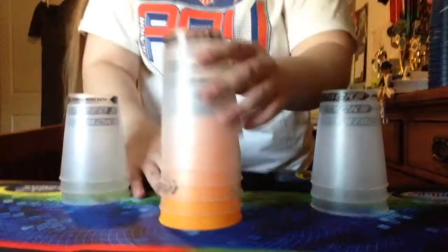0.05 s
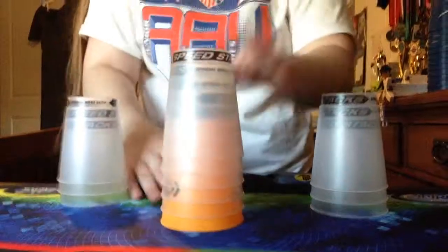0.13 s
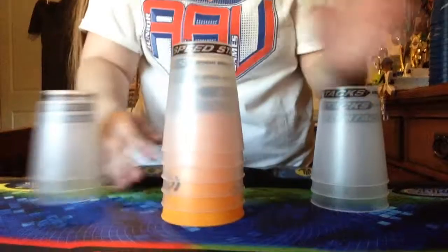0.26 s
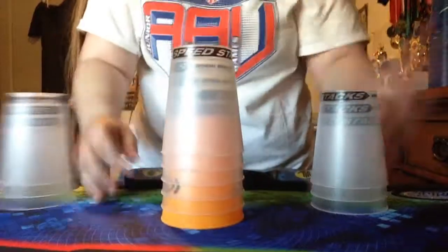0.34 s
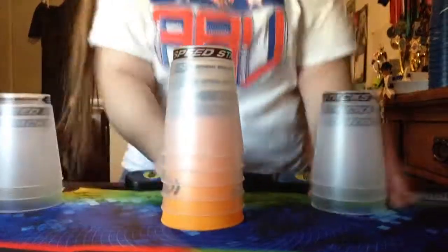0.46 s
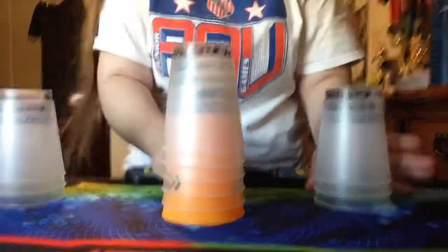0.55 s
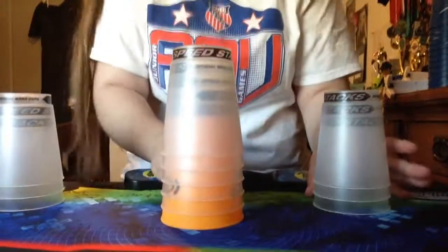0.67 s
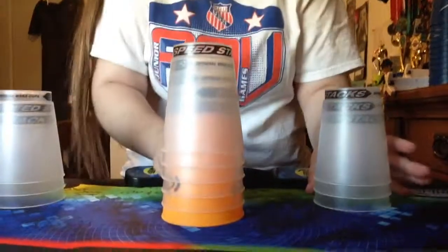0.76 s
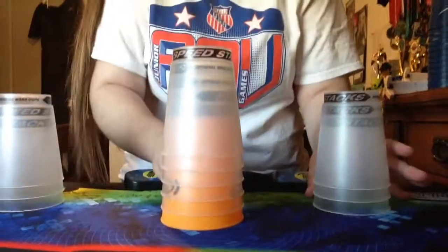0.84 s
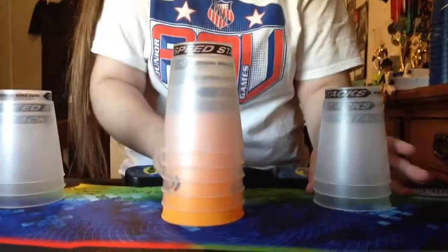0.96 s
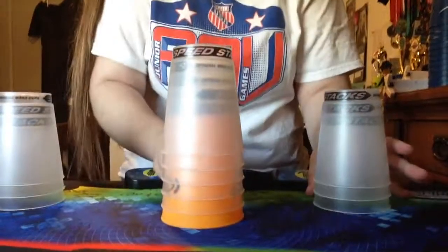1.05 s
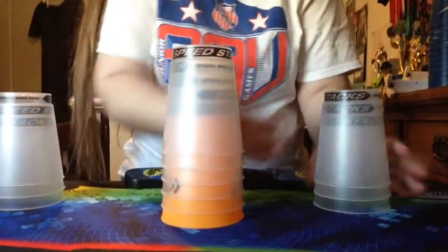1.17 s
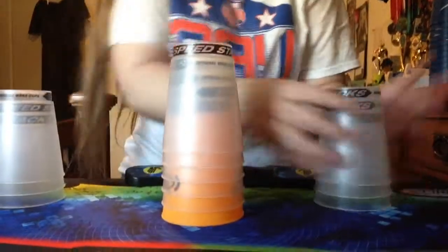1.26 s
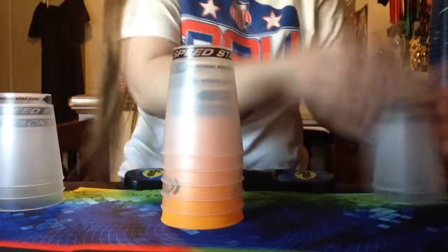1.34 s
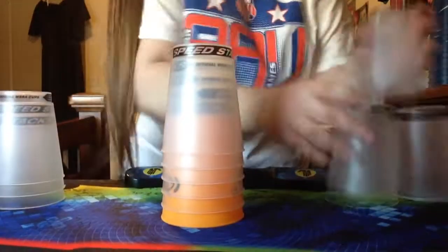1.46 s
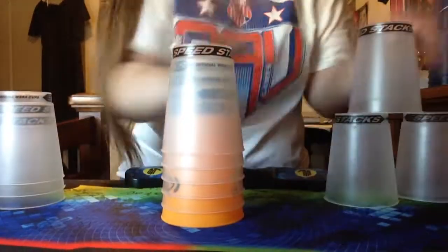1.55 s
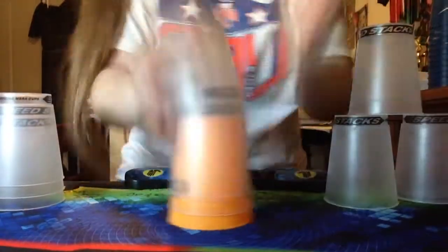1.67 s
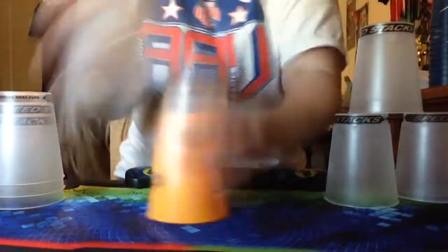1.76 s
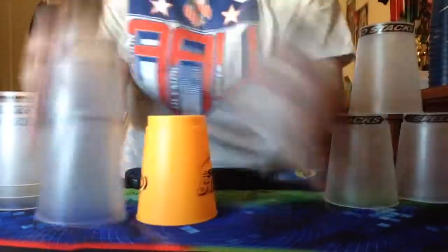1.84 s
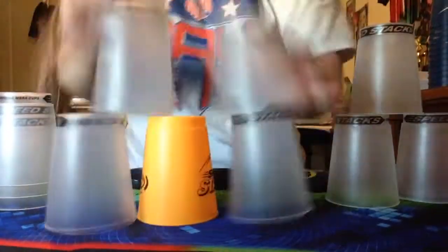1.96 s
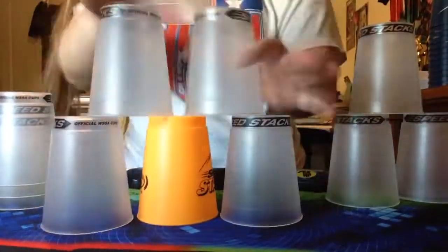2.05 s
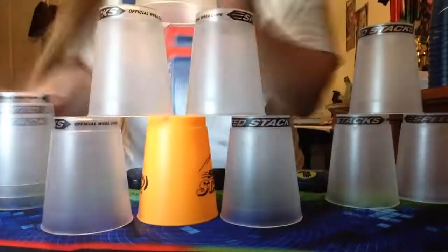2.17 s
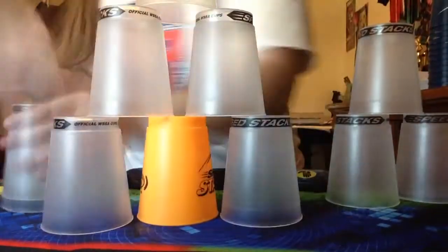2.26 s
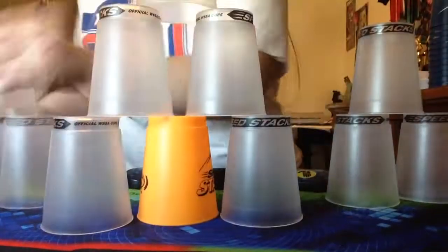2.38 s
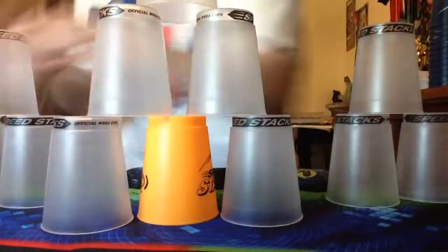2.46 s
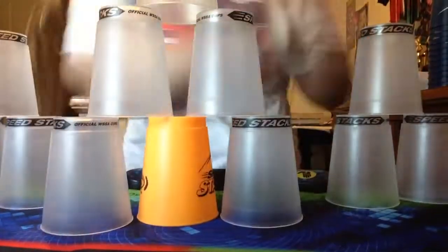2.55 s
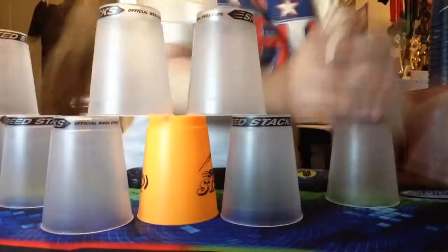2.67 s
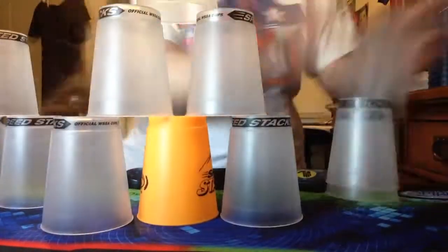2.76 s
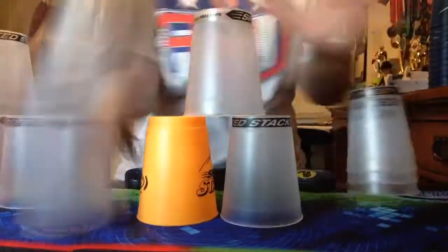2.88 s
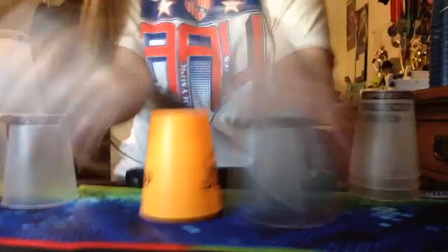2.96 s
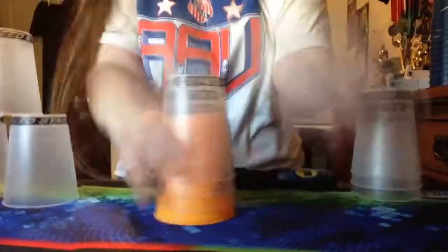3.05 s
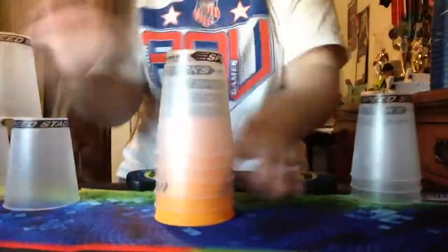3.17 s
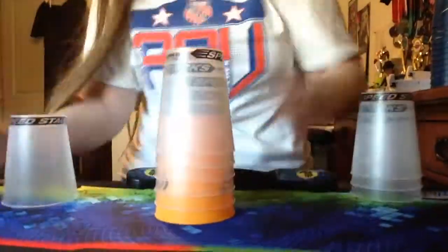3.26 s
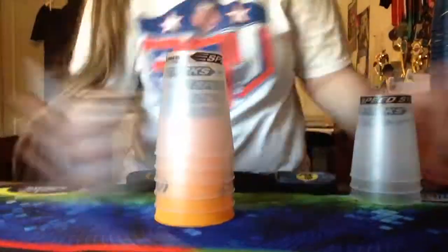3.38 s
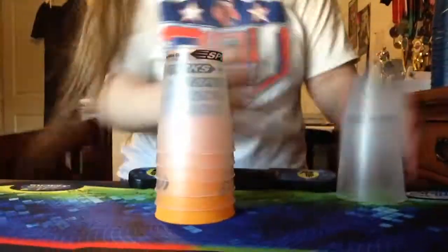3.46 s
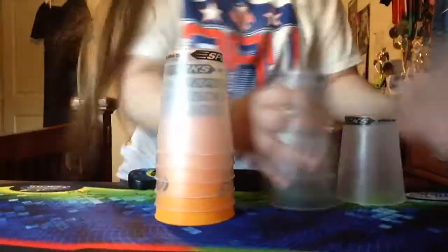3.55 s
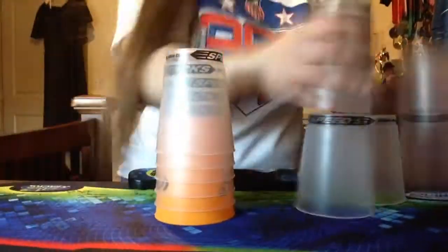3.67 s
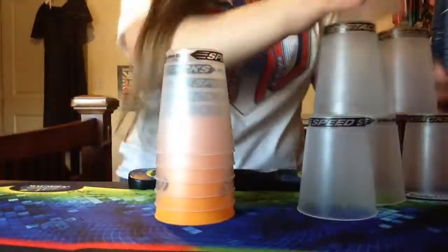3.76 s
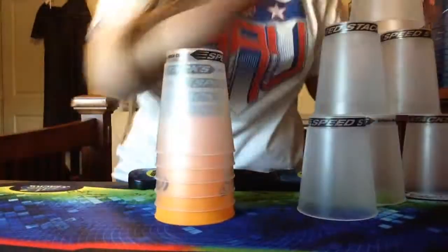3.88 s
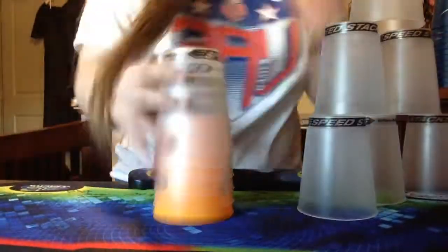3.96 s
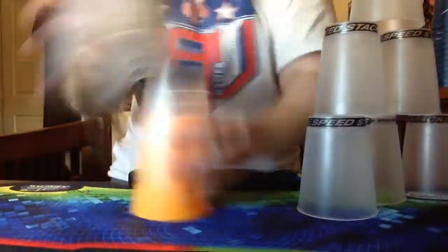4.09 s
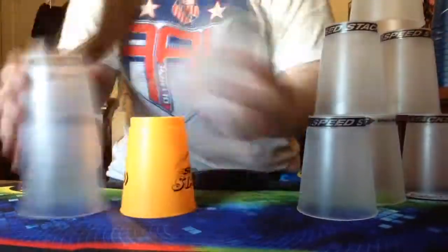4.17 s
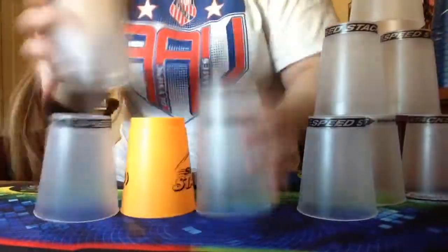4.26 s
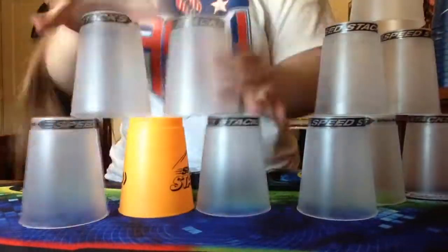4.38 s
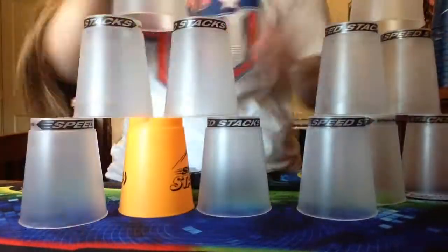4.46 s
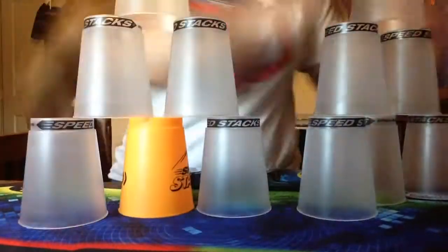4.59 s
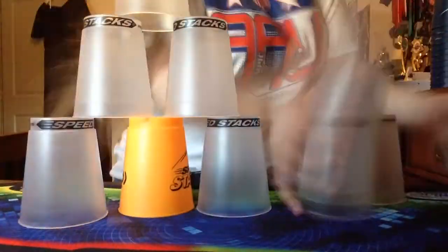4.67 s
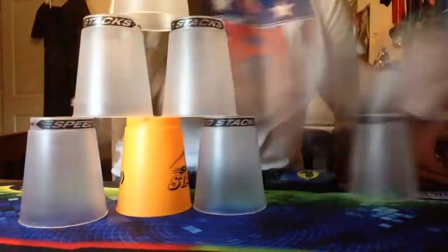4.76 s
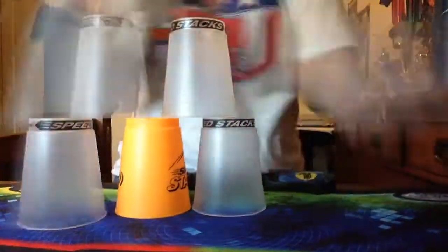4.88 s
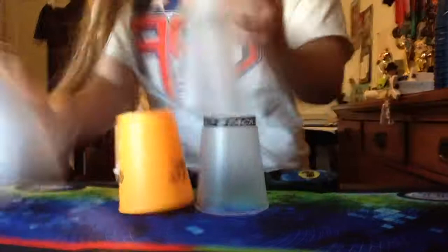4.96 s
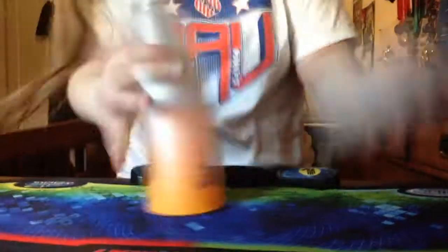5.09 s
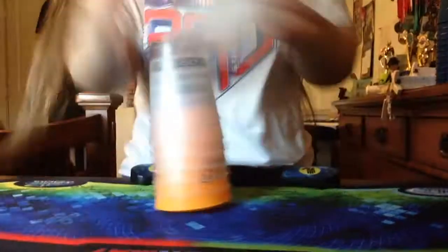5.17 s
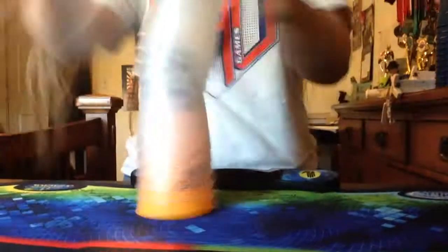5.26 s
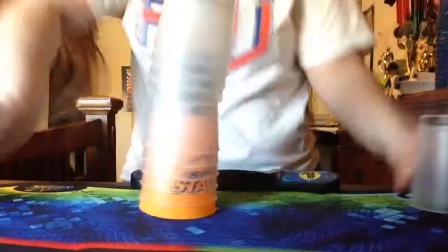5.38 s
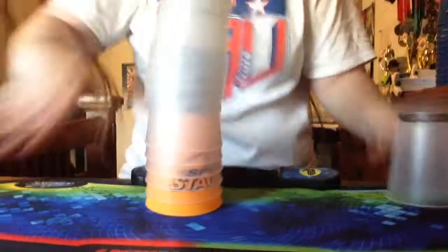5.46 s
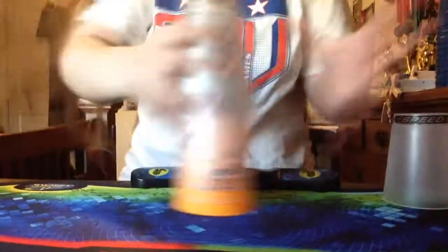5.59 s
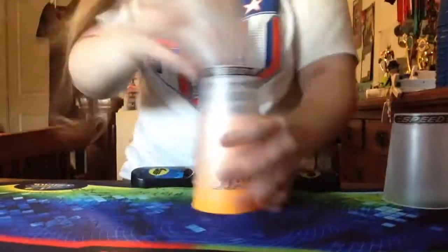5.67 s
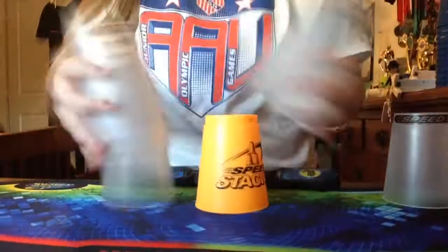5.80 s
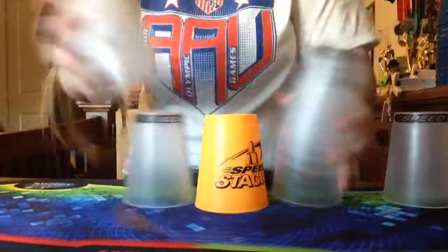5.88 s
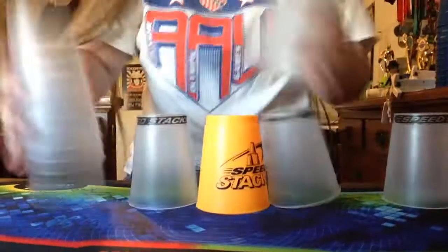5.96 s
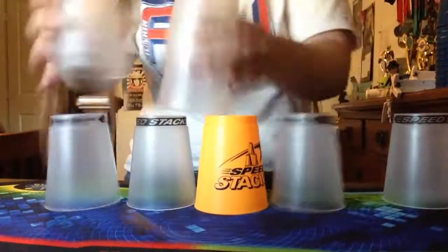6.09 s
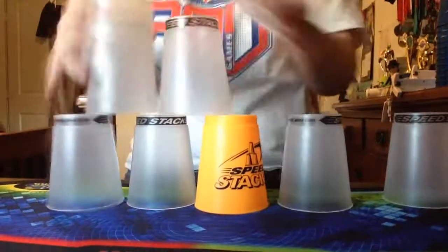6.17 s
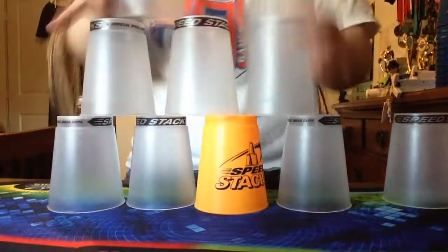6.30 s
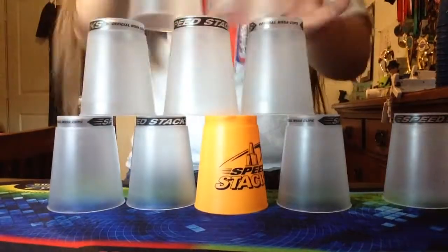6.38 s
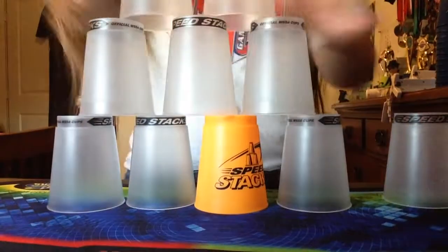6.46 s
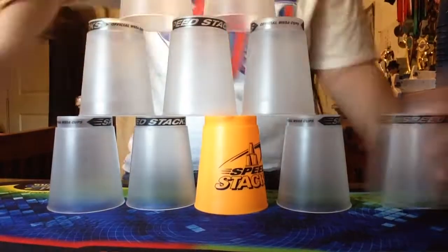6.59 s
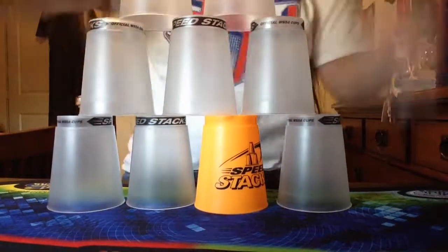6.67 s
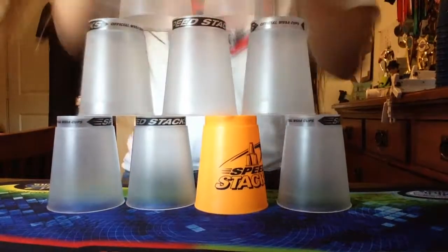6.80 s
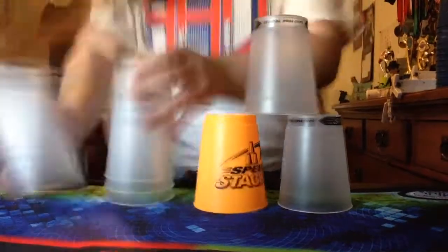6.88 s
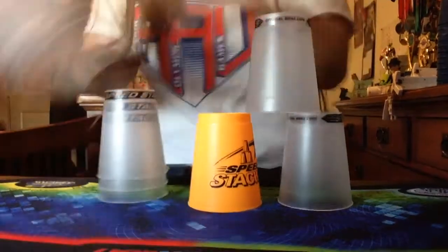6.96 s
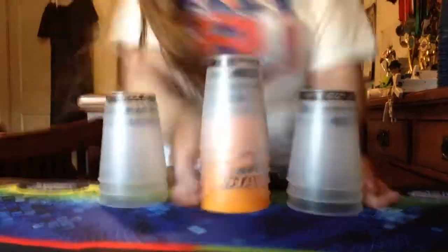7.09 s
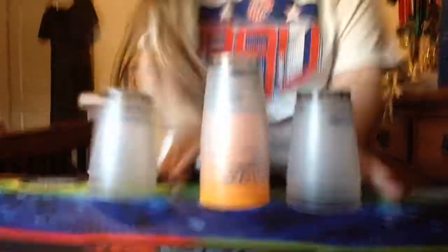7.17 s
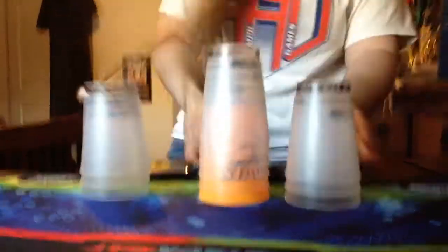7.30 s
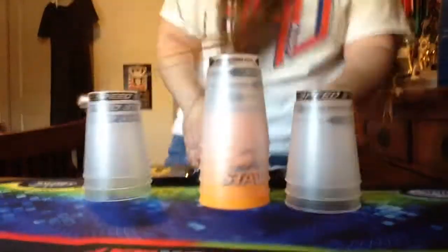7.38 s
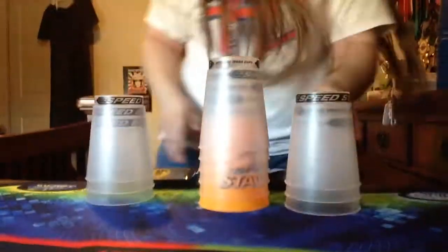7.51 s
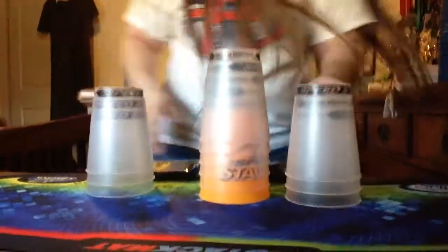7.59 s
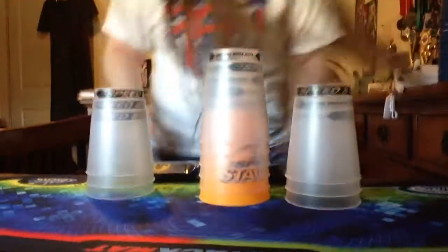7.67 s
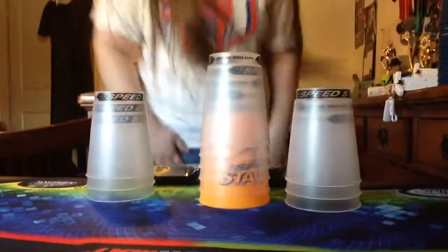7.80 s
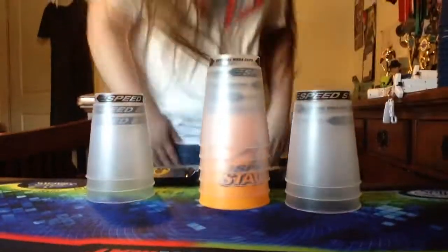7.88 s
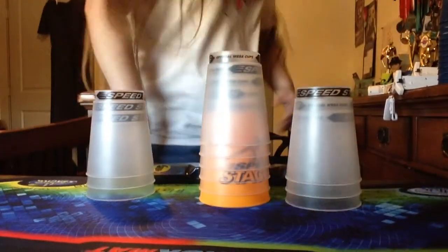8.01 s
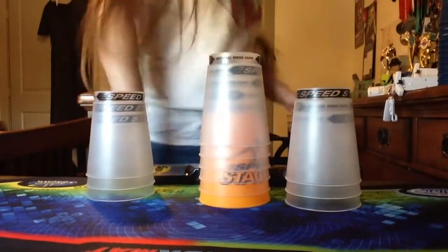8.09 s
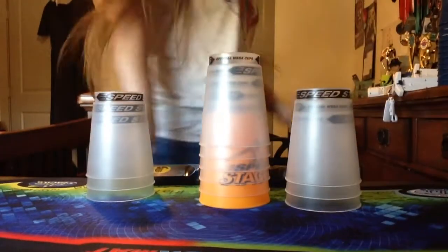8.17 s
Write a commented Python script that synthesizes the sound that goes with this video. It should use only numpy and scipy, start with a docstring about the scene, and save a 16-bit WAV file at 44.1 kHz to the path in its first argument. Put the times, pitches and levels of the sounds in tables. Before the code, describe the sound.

Close up in a small room, light plastic cups are stacked and unstacked very fast on a soft mat over a wooden table. After a few quiet taps come bursts of hollow clacks and dry rim clicks, then loud rattling collapses as cups nest, with falling pitch. It ends with two big rattles, near silence and one hand clap.

```python
"""A small room with a mat on a wooden table: plastic cups are stacked into pyramids and swept down at speed.
Rims click as short noise cracks with a ping; cups knock and the table thumps as damped modes.
Nesting cups rattle with a hollow note falling in pitch, sliding walls hiss in grains, one hand clap ends the run.
Decaying noise echoes form the room; a close mono microphone with a fast limiter picks it up."""
import sys
import numpy as np
from scipy import signal
from scipy.fft import rfft, irfft, next_fast_len
from scipy.io import wavfile
from scipy.ndimage import uniform_filter1d, minimum_filter1d

SR = 44100
rng = np.random.default_rng(int(sys.argv[2]) if len(sys.argv) > 2 else 0)


def digitize_waveform(pressure):
    """Quantize a signal to 16-bit integers and store it at the path in sys.argv[1].

    Rows of a 2-D input are taken as channels; values are limited to [-1, 1].
    """
    field = np.atleast_2d(pressure).T
    bounded = np.clip(field, -1, 1)
    quanta = np.round(bounded * 32767).astype(np.int16)
    wavfile.write(sys.argv[1], SR, quanta)


N = 363384
TOP_HZ = 15600  # band limit
TIME_S = np.arange(N) / SR
HIT_S = np.arange(SR // 5) / SR  # time since a blow
TICK_S = HIT_S[:SR // 25]


def amp(db):
    """Decibels to linear amplitude."""
    return 10 ** (np.asarray(db) / 20)


def unit(x, size=None):
    """Scale to rms 1 over the first size samples."""
    return x / np.sqrt(np.mean(x[:size] ** 2) + 1e-20)


def along(points, hz):
    """Interpolate (Hz, value) points on a log frequency axis."""
    point_hz, value = np.transpose(points)
    return np.interp(np.log(hz + 1), np.log(point_hz), value)


def add(track, start_s, sound):
    """Mix a sound into a track."""
    start = max(round(start_s * SR), 0)
    part = track[start:start + len(sound)]
    part += sound[:len(part)]


def colour(x, spectrum, size=4096):
    """Causal minimum-phase filter of unit energy with the given spectrum."""
    gain = amp(along(spectrum, np.fft.rfftfreq(size, 1 / SR)))
    cepstrum = irfft(np.log(gain))
    # fold onto positive time
    cepstrum[1:size // 2] *= 2
    cepstrum[size // 2 + 1:] = 0
    kernel = irfft(np.exp(rfft(cepstrum)))
    return signal.oaconvolve(x, kernel / np.linalg.norm(kernel))[:len(x)]


def ring(modes, t, scale, detune, scatter_db, attack_s):
    """Damped modes; where the blow lands sets their strengths and signs, the grip shifts their pitch."""
    hz, db, t60_s = np.transpose(modes)[:, :, None]
    shift, strength, side = rng.standard_normal((3, len(modes), 1))
    mode_hz = hz * scale * np.exp(detune * shift)
    waves = np.sign(side) * np.sin(2 * np.pi * mode_hz * t)
    level_db = db + scatter_db * strength - 60 * t / t60_s
    return (amp(level_db) * waves).sum(0) * (1 - np.exp(-t / attack_s))


def burst(t60_s, ripple_db, attack_s=0.00062):
    """The brief noise of a contact between yielding things; each spot favours its own broad bands."""
    size = 2 * len(TICK_S)
    envelope = amp(-60 * TICK_S / t60_s) * (1 - np.exp(-TICK_S / attack_s))
    spectrum = rfft(rng.standard_normal(len(TICK_S)) * envelope, size)
    band_hz = np.geomspace(500, 16000, 18)
    bands = np.c_[band_hz, ripple_db * rng.standard_normal(len(band_hz))]
    gain = amp(along(bands, np.fft.rfftfreq(size, 1 / SR)))
    # keep the phases, replace the magnitudes
    noise = irfft(spectrum / np.abs(spectrum) * gain)[:len(TICK_S)]
    return unit(noise, size=SR // 333)


# background air spectrum: (freq_hz, level_db)
AIR_SPECTRUM = [(40, -20), (100, -6), (190, 8), (500, -2), (1200, -13), (8000, -21), (15000, -25)]


def air():
    """Steady, low-pitched background noise."""
    return amp(-57) * colour(rng.standard_normal(N), AIR_SPECTRUM)


# room tail spectrum: (freq_hz, level_db)
ROOM_SPECTRUM = [(60, 5), (180, 5), (400, 5), (800, 7), (2200, 6.5), (5000, 4), (8000, 2), (14000, 5)]
# room decay: (freq_hz, t60_s)
ROOM_DECAY = [(180, .65), (500, .44), (1500, .4), (3000, .44), (8000, .41), (14000, .3)]


def room(x, build_s, walls_s, walls_db):
    """Strong wall echoes, then a diffuse tail, its noise drawn anew every 0.2 s."""
    out, size = np.zeros(N), SR // 5
    for start in range(0, N, size):
        hz, t, noise = signal.stft(rng.standard_normal(SR * 3 // 4), SR, nperseg=256)
        colour_db = along(ROOM_SPECTRUM, hz)[:, None]
        decay_db = 60 * t / along(ROOM_DECAY, hz)[:, None]
        early_db = walls_db * np.exp(-(t / walls_s) ** 4)
        gain = amp(colour_db - decay_db + early_db) * (1 - np.exp(-t / build_s))
        tail = signal.istft(noise * gain, SR, nperseg=256)[1]
        echo = signal.fftconvolve(x[start:start + size], tail / np.linalg.norm(tail))
        add(out, start / SR, echo)
    return out


# hand clap, palms then fingers: (start_s, level_db)
CLAP_SLAPS = [(7.786, -11), (7.7902, -14.5)]
# cupped-palm spectrum: (freq_hz, level_db)
PALM_SPECTRUM = [(120, -14), (300, -2), (560, 11), (900, 6), (1700, -2), (2700, -4), (3400, 3), (4500, -4),
                 (5600, -5), (7700, 1), (10500, -6), (13000, -19)]


def clap():
    """Two quick slaps with the hollow note of cupped palms."""
    out = np.zeros(N)
    for start_s, level_db in CLAP_SLAPS:
        add(out, start_s, amp(level_db) * burst(t60_s=0.016, ripple_db=3.5))
    return colour(out, PALM_SPECTRUM)


# cup walls sliding on each other: (start_s, end_s, level_db)
WALL_SLIDES = [(0.317, 0.452, -50.5), (1.392, 1.444, -35.5), (1.748, 1.778, -27), (1.85, 1.88, -31),
               (2.31, 2.343, -28), (2.406, 2.431, -19.5), (2.58, 2.686, -44.5), (2.724, 2.812, -27),
               (4.089, 4.131, -29), (4.522, 4.652, -29), (6.811, 6.818, -38.5)]
# rubbing spectrum: (freq_hz, level_db)
RUB_SPECTRUM = [(300, -11), (1500, -15), (5500, -0.5), (8200, 7.5), (11000, -3), (15000, -9.5)]


def slides(grain_db=3):
    """Matt plastic hisses in fine grains as one cup slips over another."""
    stroke = np.zeros(N)
    for start_s, end_s, level_db in WALL_SLIDES:
        progress = np.clip((TIME_S - start_s) / (end_s - start_s), 0, 1)
        stroke += amp(level_db) * np.sqrt(np.abs(np.sin(np.pi * progress)))
    flutter = unit(uniform_filter1d(rng.standard_normal(N), size=90))
    grains = unit(amp(grain_db * flutter) * rng.standard_normal(N))
    return stroke * colour(grains, RUB_SPECTRUM)


# rim crack spectrum: (freq_hz, level_db)
CRACK_SPECTRUM = [(150, -3.5), (900, -2.5), (2200, -9), (4000, -5.5), (6000, -4.5), (7900, 2.5),
                  (10000, -4), (12500, -14), (15000, -19.5)]
# struck spot of the wall: its pitch differs from tap to tap
PING_HZ, PING_SPREAD, PING_T60_S, PING_DB = 2500, 0.5, 0.016, -15


def rim_clicks(rows, ripple_db):
    """Thin rims give a dry crack with a very short ping, and chatter once as they settle."""
    cracks, pings = np.zeros((2, N))
    for start_s, level_db in rows:
        add(cracks, start_s, amp(level_db) * burst(0.008, ripple_db))
        chatter_s = 0.0037 * np.exp(0.5 * rng.standard_normal())
        add(cracks, start_s + chatter_s, amp(level_db - 13) * burst(0.0085, ripple_db))
        ping_hz = min(PING_HZ * np.exp(PING_SPREAD * rng.standard_normal()), TOP_HZ)
        mode = [(ping_hz, PING_DB, PING_T60_S)]
        ping = ring(mode, TICK_S, 1, detune=0, scatter_db=5, attack_s=0.0002)
        add(pings, start_s, amp(level_db) * ping)
    return colour(cracks, CRACK_SPECTRUM) + pings


# table top modes: (freq_hz, level_db, t60_s)
TABLE_MODES = [(123, -13, 0.26), (178.3, -2, 0.14), (189.7, 3.5, 0.14), (244.5, -5.5, 0.11), (269, 0, 0.14),
               (300, 3.5, 0.096), (355, -3.5, 0.11)]
# cup body modes: (pitch_multiple, level_db, t60_s)
CUP_MODES = [(.72, -1, 0.025), (.87, -1.5, 0.029), (1, 0.5, 0.031), (1.22, -2, 0.03), (1.5, -6.5, 0.043),
             (1.9, -4, 0.016), (2.7, -9, 0.014), (4, -22.5, 0.03)]
# clack spectrum: (freq_hz, level_db)
CLACK_SPECTRUM = [(100, -22.5), (350, 10.5), (800, 5.5), (1400, -7), (2400, -15), (5000, -28.5)]


def landings(rows):
    """A landing cup gives a clack and a hollow knock and, through the soft mat, thumps the table."""
    tones, clacks = np.zeros((2, N))
    for start_s, thump_db, knock_db, pitch_hz in rows:
        table = ring(TABLE_MODES, HIT_S, 1, detune=0.058, scatter_db=4.0, attack_s=0.0025)
        cup = ring(CUP_MODES, HIT_S[:SR // 10], pitch_hz, detune=0.061, scatter_db=3.0, attack_s=0.0011)
        add(tones, start_s, amp(thump_db) * unit(table, size=SR // 60))
        add(tones, start_s, amp(knock_db) * unit(cup, size=SR // 83))
        add(clacks, start_s, amp(knock_db) * burst(t60_s=0.033, ripple_db=2.0))
    return tones + colour(clacks, CLACK_SPECTRUM)


# a hand or a held stack meets the mat: (start_s, level_db)
MAT_THUMPS = [(0.006, -33.5), (1.283, -34.5), (1.38, -34.5), (1.422, -28.5), (1.715, -17), (1.814, -12),
              (1.865, -21), (2.268, -24.5), (2.873, -14.5), (3.073, -21.5), (3.804, -20), (4.055, -24.5),
              (4.804, -16), (6.198, -22.5), (7.48, -34.5)]
THUMP_KNOCK_DB, THUMP_HZ = -6.5, 432  # cup knock relative to the thump, its pitch; the grip damps the cup


def thumps():
    """Hands and gripped stacks land softly: mostly the table answers."""
    return landings([(start_s, level_db, level_db + THUMP_KNOCK_DB, THUMP_HZ)
                     for start_s, level_db in MAT_THUMPS])


# top cup set down on a pyramid: (start_s, level_db)
CROWN_CUPS = [(2.123, -9.5), (3.863, -20), (4.472, -14.5), (6.47, -12.5)]


def crowns(pitch_hz=1331.55, t60_s=0.061):
    """Standing on two others, the top cup is free to ring hollow."""
    out = np.zeros(N)
    for start_s, level_db in CROWN_CUPS:
        note = ring([(pitch_hz, 0, t60_s)], HIT_S, 1, detune=0.012, scatter_db=2.5, attack_s=0.00029)
        add(out, start_s, amp(level_db) * note)
    return out


def contacts(rate_per_s, scatter_db, count):
    """Unevenly spaced contacts of one nesting cup: time since its start in s, strength in dB."""
    slot, force = rng.standard_normal((2, count))
    return np.abs(np.arange(count) + 0.3 + 0.4 * slot) / rate_per_s, scatter_db * force


# cups drop into one another: (start_s, slide_home_s, rim_chatter_db, body_knock_db)
NESTINGS = [(0.54, 0.031, -22, -18), (1.572, 0.031, -37, -18.5), (2.449, 0.042, -33, -32.5),
            (2.9, 0.025, -17, -21.5), (2.945, 0.049, -8, -11.5), (3.041, .05, -16.5, -23.5),
            (3.13, 0.045, -21.5, -16.5), (3.216, 0.032, -38.5, -16.5), (3.315, 0.055, -17, -22),
            (3.47, 0.037, -18.5, -30), (4.705, 0.048, -12.5, -17.5), (4.84, 0.044, -16.5, -22),
            (4.926, 0.068, -6.5, -11), (5.03, 0.071, -13.5, -16.5), (5.15, 0.038, -23, -22.5),
            (5.228, 0.039, -20, -26.5), (6.853, 0.074, -3, -7.5), (7.078, .045, -2, -7.5)]
CHATTER_PER_S, BUMPS_PER_S = 100, 52  # contacts of the rims and of the bodies
SWELL_DB, SETTLE_DB_PER_S = 6, 309.5  # knocks grow as the cup sinks; all dies away once it is home
SHALLOW_HZ, HOME_HZ = 1168, 601.5  # the hollow note falls as the cup sinks
TABLE_HOME_DB, TABLE_SWELL_DB = -2, 11  # relative to the knock; the table shakes as the cup bottoms out


def rattle(ripple_db):
    """Rims chatter while a cup slides home; its knocks swell and fall in pitch, then the stack settles."""
    taps, bumps = [], []
    for start_s, slide_s, rim_db, body_db in NESTINGS:
        t, force_db = contacts(CHATTER_PER_S, scatter_db=4.5, count=15)
        settle_db = SETTLE_DB_PER_S * np.maximum(t - slide_s, 0)
        taps += zip(start_s + t, rim_db + force_db - settle_db)

        t, force_db = contacts(BUMPS_PER_S, scatter_db=4, count=7)
        to_go = np.maximum(1 - t / slide_s, 0)
        settle_db = SETTLE_DB_PER_S * np.maximum(t - slide_s, 0)
        knock_db = body_db + force_db - SWELL_DB * to_go - settle_db
        thump_db = knock_db + TABLE_HOME_DB - TABLE_SWELL_DB * to_go
        pitch_scatter = np.exp(0.2496 * rng.standard_normal(len(t)))
        pitch_hz = HOME_HZ * (SHALLOW_HZ / HOME_HZ) ** to_go * pitch_scatter
        bumps += zip(start_s + t, thump_db, knock_db, pitch_hz)
    return rim_clicks(taps, ripple_db) + landings(bumps)


# single loud clicks: cup rims, among nestings and landings too, and at 7.35 s a hand stopping the timer:
# (start_s, level_db)
SINGLE_CLICKS = [(0.072, -23.5), (0.188, -25.5), (1.366, -29.5), (1.439, -18.5), (1.516, -22.5),
                 (1.719, -25), (2.122, -11.5), (2.289, -23.5), (2.414, -15.5), (2.463, -9.5), (2.824, -8),
                 (2.838, -6), (2.897, -5.5), (3.341, 0.5), (3.473, -2.5), (3.682, -29), (3.816, -17.5),
                 (4.047, -16), (4.219, -27.5), (4.84, -17), (4.881, -6.5), (4.969, 3), (5.177, -9.5),
                 (5.225, -3.5), (5.354, -21.5), (5.367, -19.5), (5.579, -10.5), (5.78, -11.5),
                 (5.998, -25.5), (6.265, -15.5), (6.361, -17), (6.485, -14), (6.84, -6), (7.057, -4.5),
                 (7.35, -24.5)]


def single_clicks(ripple_db):
    """Single loud clicks: cup rims, among nestings and landings too, and a hand stopping the timer."""
    return rim_clicks(SINGLE_CLICKS, ripple_db)


# a cup is set down: (start_s, table_thump_db, cup_knock_db, cup_pitch_hz, rim_click_db)
CUP_PLACINGS = [(0.149, -30.5, -35.5, 383, -31.5), (0.203, -32.5, -33, 610, -23),
                (0.45, -13, -20.5, 466, -20), (0.538, -15.5, -20, 754, -6), (1.452, -23, -25, 784, -13.5),
                (1.546, -16.5, -9.5, 513, -18), (1.57, -14.5, -24.5, 730, -5.5),
                (1.804, -24, -20.5, 417, -12.5), (1.915, -17.5, -16.5, 646, -11),
                (1.981, -18, -11.5, 540, -9.5), (2.049, -20.5, -17, 783, -12.5),
                (2.108, -22, -12, 574, -6.5), (2.35, -18.5, -21, 495, -15), (2.442, -11, -6, 712, -21),
                (2.485, -15, -14, 453, -31.5), (2.702, -17.5, -19.5, 526, -15.5),
                (2.744, -13.5, -16, 700, -22), (3.142, -7.5, -23.5, 448, -6), (3.216, -15, -22.5, 610, 0),
                (3.3, -12, -15, 460, -16.5), (3.425, -19, -18, 660, -12), (3.462, -9, -11.5, 713, -13.5),
                (3.651, -13.5, -14.5, 555, -20), (3.7, -24, -18.5, 461, -14), (3.743, -21.5, -22, 712, -16),
                (3.83, -24.5, -14, 594, -16), (3.861, -24.5, -12.5, 582, -10), (4.134, -16, -18, 740, -7.5),
                (4.253, -18, -12.5, 685, -10.5), (4.328, -17, -12.5, 592, -14),
                (4.401, -23.5, -19, 590, -13.5), (4.471, -49, -22.5, 695, -17),
                (4.486, -25.5, -15.5, 499, -12), (4.689, -16.5, -15.5, 776, -23.5),
                (4.749, -11, -10, 528, -24.5), (5.104, -6.5, -16, 538, -15.5),
                (5.423, -16.5, -12.5, 450, -25), (5.441, -8.5, -5.5, 640, -11), (5.7, -39, -27, 876, -18),
                (5.725, -13, -22, 407, -18), (5.876, -16.5, -12.5, 603, -11.5),
                (5.954, -13.5, -16.5, 450, -13), (6.054, -20, -12, 660, -10.5),
                (6.134, -18.5, -9.5, 475, -15.5), (6.235, -21.5, -10, 546, -10.5),
                (6.318, -17.5, -9.5, 497, -14.5), (6.395, -24.5, -20, 560, -19),
                (6.451, -21, -14.5, 595, -10.5), (6.469, -22.5, -13.5, 621, -10.5),
                (6.658, -16.5, -15.5, 609, -21.5), (7.529, -45, -35, 534, -35)]
ROCK_S, ROCK_SPREAD, ROCK_DB = 0.0078, 0.38, -9  # the far side of a tilted rim touches later and softer


def placings(ripple_db):
    """A cup set down knocks, clicks with one side of its rim and rocks onto the other."""
    start_s, thump_db, knock_db, pitch_hz, rim_db = np.transpose(CUP_PLACINGS)
    rock_s = ROCK_S * np.exp(ROCK_SPREAD * rng.standard_normal(len(start_s)))
    taps = [*zip(start_s, rim_db), *zip(start_s + rock_s, rim_db + ROCK_DB)]
    return landings(zip(start_s, thump_db, knock_db, pitch_hz)) + rim_clicks(taps, ripple_db)


def cups(ripple_db):
    """All cup sounds; ripple_db is how unevenly the rims radiate over frequency."""
    touches = slides() + thumps() + crowns()
    return touches + rattle(ripple_db) + single_clicks(ripple_db) + placings(ripple_db)


def scene():
    """The cups are close and fairly dry; the clap is farther back and fills the room."""
    # a cup beams each band its own way: the microphone hears one direction, the room the even sum of all
    beamed, spread = cups(ripple_db=6), cups(ripple_db=1)
    hands = clap()
    cup_echo = amp(-7) * room(spread, build_s=0.0046, walls_s=0.039, walls_db=1.5)
    clap_echo = room(hands, build_s=0.066, walls_s=0.055, walls_db=10.5)
    mono = beamed + hands + cup_echo + clap_echo + air()
    return np.array([mono, mono])


def record(dry, drive_db=2.57, ceiling=0.8, hold_s=0.0026, low_cut_hz=100):
    """The microphone sheds deep bass, a fast limiter holds peaks down, nothing passes above the band limit."""
    low_cut = signal.butter(2, low_cut_hz, "highpass", fs=SR, output="sos")
    x = amp(drive_db) * signal.sosfilt(low_cut, dry)
    size = max(int(hold_s * SR), 2)
    needed_gain = np.minimum(1, ceiling / (np.abs(x) + 1e-9))
    x = x * uniform_filter1d(minimum_filter1d(needed_gain, size), size)
    padded = next_fast_len(N + SR // 4)
    passed = np.fft.rfftfreq(padded, 1 / SR) < TOP_HZ
    return irfft(rfft(x, padded) * passed, padded)[:, :N]


dry = scene()
out = record(dry)
digitize_waveform(out)
```